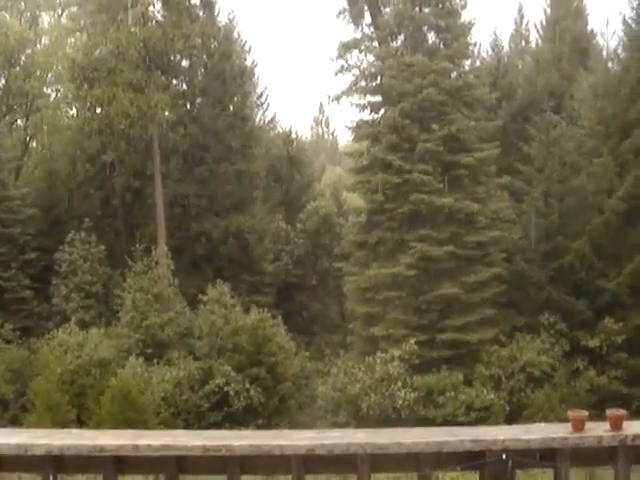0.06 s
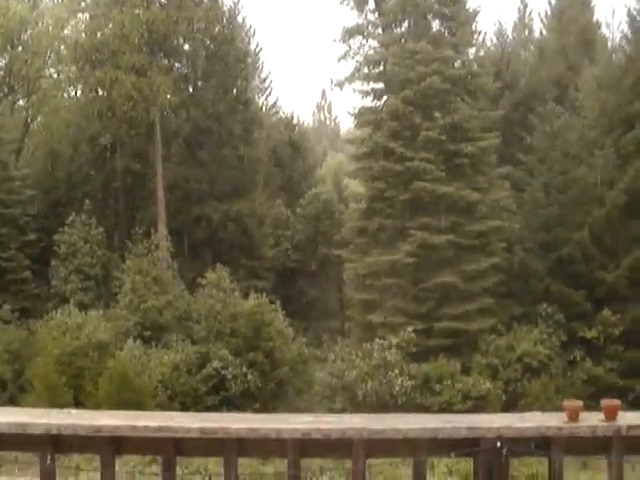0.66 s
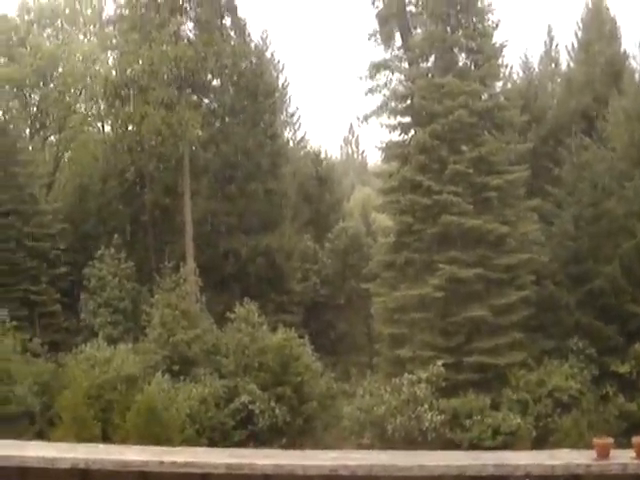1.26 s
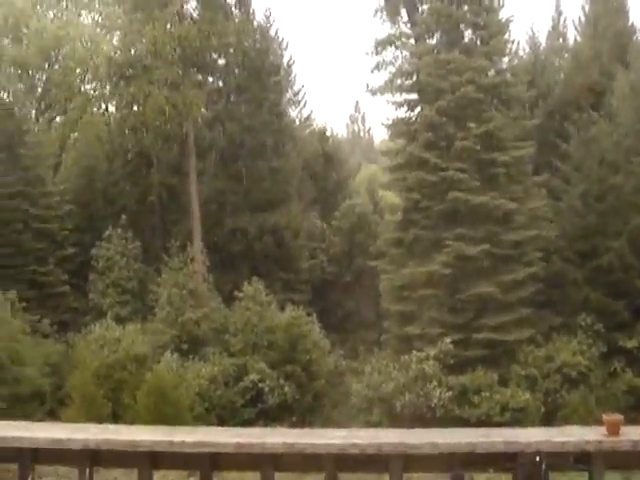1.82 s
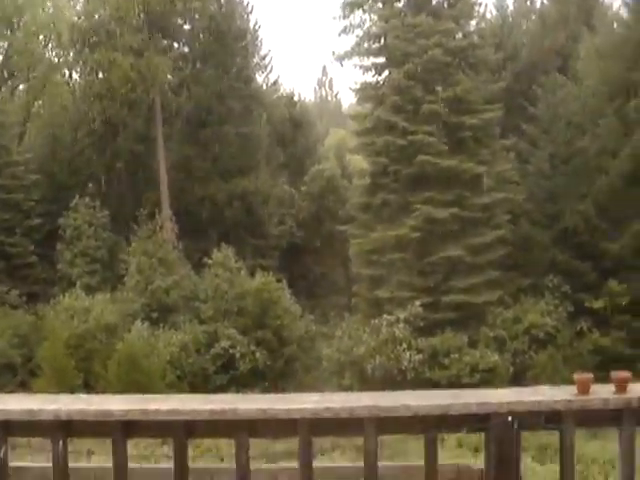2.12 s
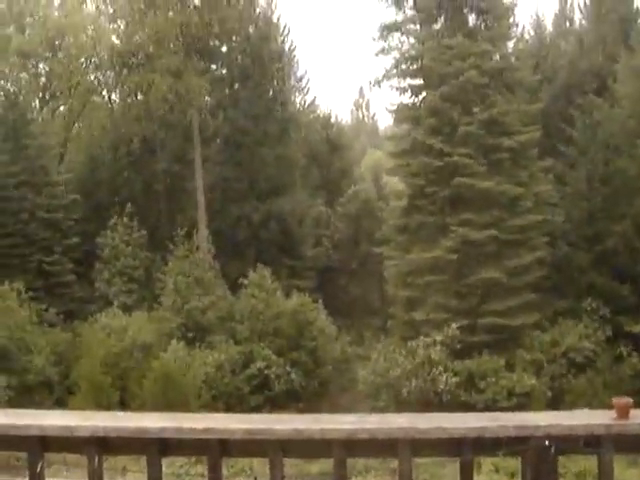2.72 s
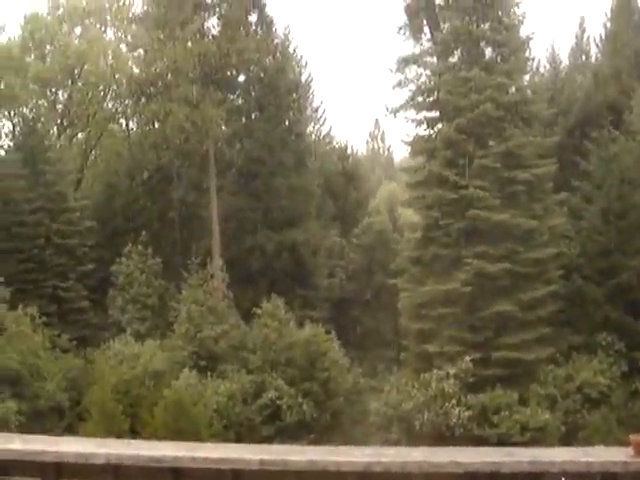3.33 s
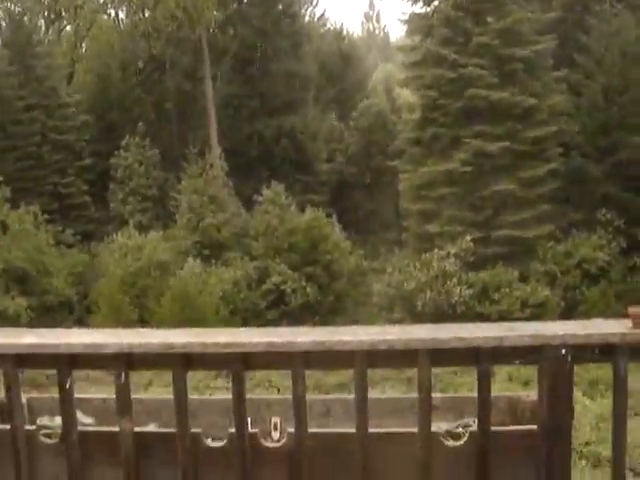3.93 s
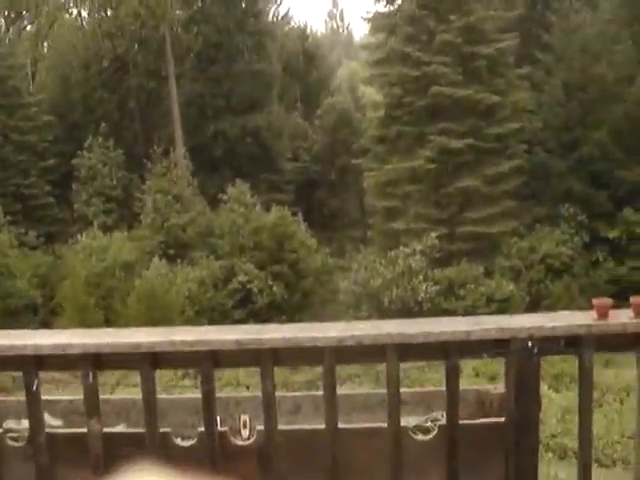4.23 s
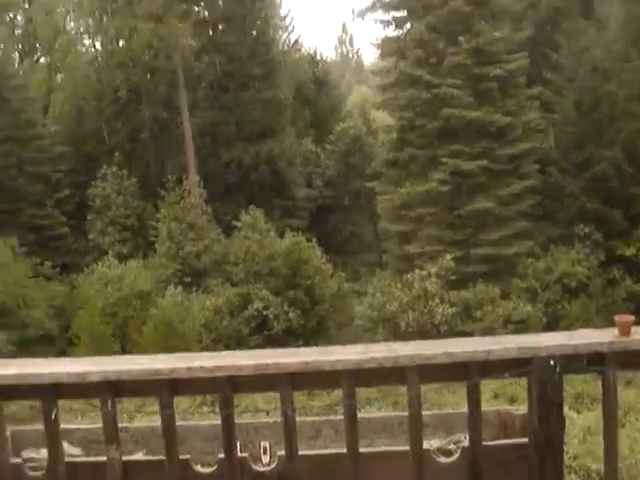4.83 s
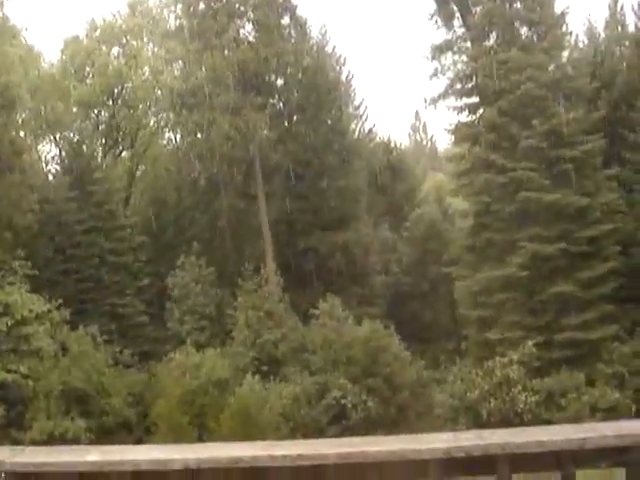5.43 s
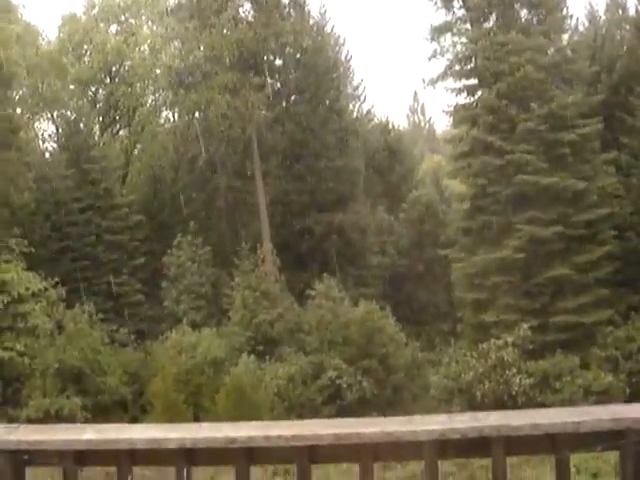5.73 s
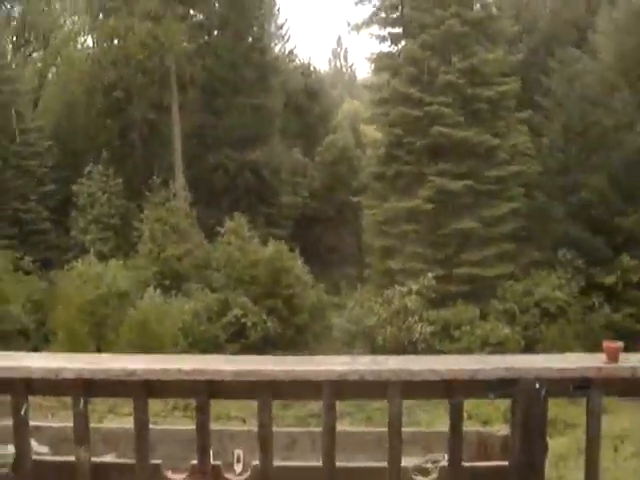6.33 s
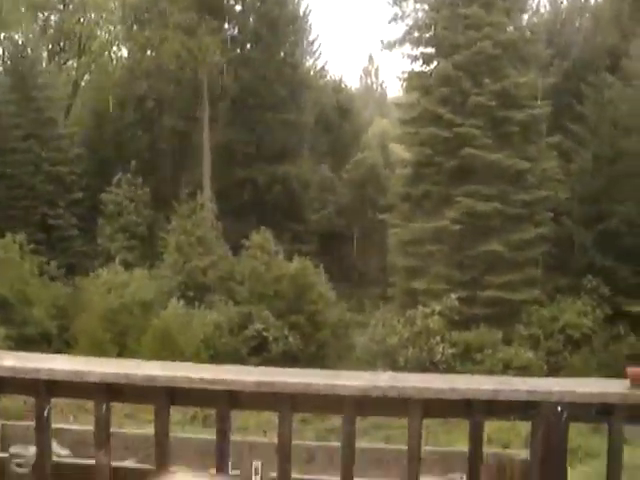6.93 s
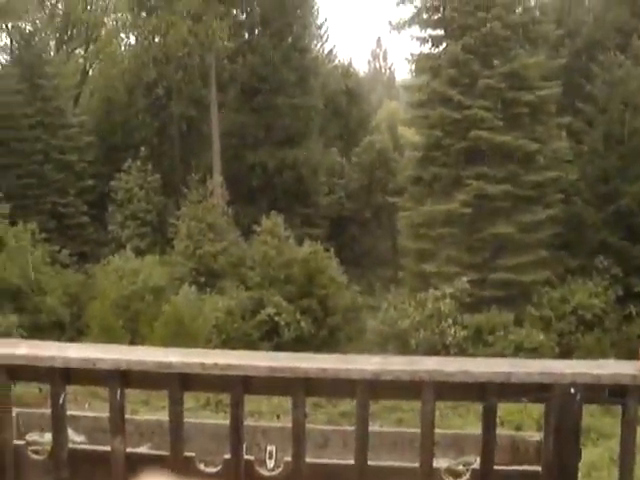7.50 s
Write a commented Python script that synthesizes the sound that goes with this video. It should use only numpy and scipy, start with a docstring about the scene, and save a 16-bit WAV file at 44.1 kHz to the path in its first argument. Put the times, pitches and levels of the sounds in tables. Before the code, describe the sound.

Steady rain falls on trees for the whole seven and a half seconds, heard from a wooden deck through a small hand-held camera. Distant drops blend into a wide, even hiss, nearer ones tick on leaves and the rail, and fine spray prickles on the boards. Single fat drips land close by at about 0.5 seconds, between 1.6 and 1.9, and now and then from 3.5 to 6.2, the brightest at 4.4. Fingers bump the camera lightly around 0.6, 1.6 and 2.7 seconds, and rub it softly near 1.5, 4, 5 and 7 seconds. Stronger knocks come at 5.2 and 5.5 seconds, then one sharp tap with a small low thump at 5.9, followed by duller knocks at 6.6 and 6.9. A very faint, thin, high electronic whine sits beneath the rain, which barely changes in strength to the end.

```python
"""Steady rain from a wooden deck

Countless far drops on trees merge into a wash; nearer ones tick on leaves and on the rail,
and fine spray prickles on the deck. It is all heard through a small hand-held camera:
fingers rub and bump its case and once tap it sharply, and its electronics whine faintly."""
import sys
import numpy as np
from scipy import signal
from scipy.fft import rfft, irfft
from scipy.io import wavfile
from scipy.ndimage import uniform_filter1d

SR = 44100
rng = np.random.default_rng(int(sys.argv[2]) if len(sys.argv) > 2 else 0)


def transcribe(signal):
    """Save signal, clipped to [-1, 1], as a 16-bit WAV file at the path in sys.argv[1]."""
    frames = np.atleast_2d(signal).T
    limited = np.clip(frames, -1, 1)
    pcm = np.round(limited * 32767).astype(np.int16)
    wavfile.write(sys.argv[1], SR, pcm)


N = 337806
TIME = np.arange(N) / SR
FREQS = np.fft.rfftfreq(N, 1 / SR)


def wash(spread_db=2.5, flicker_db=0.77, count=90000):
    """Rain on the whole wood arrives from all sides, partly shared by the two microphone ports."""
    # tone of the wash: f/Hz, relative level per Hz/dB, left minus right/dB
    tone = [(15.0, -2, 2), (30.0, -0.5, -3), (60.0, -5.5, -6), (120.0, -2, -4.5), (216, -2.5, -6),
            (443, -0.5, -5.5), (650.0, 1, -3.5), (980, 1.76, -1), (1790, -1, -3), (2770, -2, -2),
            (3540, -5.5, 1), (4620, -6.5, 1.2), (6020, -10.5, 2.5), (6940, -13, 0), (10330, -19, 0.5)]
    # stereo image at the ports: f/Hz, likeness/0-1, lead of the left port/rad
    image = [(60.0, 0.57, 3.3), (120.0, 0, 2.63), (230, 0.77, 0.94), (428, 0.61, 0.3), (650.0, 0.71, 0.38),
             (1800.0, 0.68, 0.3), (2700.0, 0.52, 1.3), (3480, 0.48, 0.43), (4730, 0.03, 0.4),
             (6080, 0.48, 0.1), (7720, 0, 4.4), (9800.0, 0.23, 2.7)]
    colour_db, balance_db = spectra(tone)
    likeness, lead = spectra(image)
    shared, left, right = (rfft(far_drops(spread_db, flicker_db, count)) for _ in range(3))
    common = np.sqrt(likeness) * shared * np.exp(.5j * np.array([lead, -lead]))
    diffuse = np.sqrt(1 - likeness) * np.array([left, right])
    eq = undb(colour_db + np.array([balance_db, -balance_db]) / 2)
    return unit(irfft((common + diffuse) * eq, N))


def far_drops(spread_db, flicker_db, count):
    """Dense impacts of unequal size; each octave flickers as boughs shed their water."""
    when, size, polarity = rng.random((count, 3)).T
    strength = np.sign(polarity - .5) * undb(-spread_db * np.log(1 - .999 * size))
    hits = np.bincount((when * N).astype(int), strength, N)
    spectrum = rfft(unit(hits))
    octave = np.log2(np.maximum(FREQS, 32) / 32)
    bands = (irfft(spectrum * np.maximum(1 - abs(octave - k), 0), N) for k in range(10))
    return sum(band * undb(flicker_db * wander(rate_hz=22)) for band in bands)


def patter(low_hz=1100, high_hz=7500, spread_db=4.0, width_db=6, cycles=0.71, count=900):
    """Drops tick on the nearer shrubs, each leaf with its own pitch and place."""
    out = np.zeros((2, N))
    for when, pitch, size, place in rng.random((count, 4)):
        hz = low_hz * (high_hz / low_hz) ** pitch
        db = -spread_db * np.log(max(size, np.exp(-4)))
        add(out, when * N / SR, splat(hz, cycles) * undb(db) * pan(width_db * (2 * place - 1)))
    return out


def drips(splash_db=-23, rebound_db=-11, rebound_s=0.0044):
    """Fat drops land close by and burst into droplets, the largest of which lands just after."""
    # single near drops: t/s, level/dB, f/Hz, decay/cycles, left minus right/dB
    near_drops = [(.504, -24.5, 1600, 1.5, -1), (1.6345, -21, 6700, 1, 1), (1.7725, -22.5, 3520, 2.3, -1),
                  (1.8757, -24, 5800, 1, 4), (3.5334, -21, 9000, .7, 8), (4.2142, -28.5, 4840, 7, 0),
                  (4.3806, -24.5, 4200, 2, -2), (4.4316, -11, 7700, .6, -2), (4.7742, -24, 8000, 0.88, 1),
                  (4.79, -20, 6450, 1, 3), (5.742, -25, 6000, 1.4, -1), (6.169, -20.5, 4900, 1.7, 0),
                  (7.2745, -33, 7600, 9, 1)]
    out = np.zeros((2, N))
    for s, db, hz, cycles, pan_db in near_drops:
        gain = undb(db) * pan(pan_db)
        impact = gain * splat(hz, cycles)
        splash = gain * crackle(fade_s=0.014, low_hz=hz / 2, high_hz=2 * hz)
        add(out, s, impact)
        add(out, s + rebound_s, undb(rebound_db) * impact)
        add(out, s, undb(splash_db) * splash)
    return out


def splat(hz, cycles):
    """A drop's impact briefly rings what it lands on."""
    t = TIME[:512]
    return np.sin(2 * np.pi * hz * t) * np.exp(-t * hz / cycles)


def spray(low_hz=4500, spread_db=3, bunch_db=4, count=2500):
    """Tiny droplets prickle on the deck in uneven bunches."""
    when, size, place = rng.random((count, 3)).T
    onsets = (when * N).astype(int)
    strength = undb(-spread_db * np.log(np.maximum(size, np.exp(-4))))
    hits = np.array([np.bincount(onsets, strength * share, N) for share in (place, 1 - place)])
    bunches = undb(bunch_db * np.tanh(wander(rate_hz=13)))
    low_cut = signal.butter(2, low_hz, "high", fs=SR, output="sos")
    return unit(signal.sosfilt(low_cut, hits * bunches))


def knocks(thump_db=-19, press_s=0.0049, leak_s=0.013):
    """Fingers bump the case; the sharpest tap also presses air into the ports, which leaks away."""
    # finger bumps: t/s, strength/dB, contact time/ms
    bumps = [(0.504, -12, 0.16), (0.7, -9, 0.7), (1.584, -9, 0.26), (2.739, -15, 0.3), (4.214, -11, 0.5),
             (5.173, -2.5, 0.25), (5.451, 2, 0.75), (5.923, 2, 0.046), (6.602, -0.5, 0.62),
             (6.695, -12, 0.4), (6.856, 1, 1)]
    out, t = np.zeros((2, N)), TIME[:8192]
    for s, db, contact_ms in bumps:
        add(out, s, undb(db) * case_ring(contact_ms))
    sharpest_s = min(bumps, key=lambda row: row[2])[0]
    thump = -undb(thump_db) * (1 - np.exp(-t / press_s)) * np.exp(-t / leak_s)
    add(out, sharpest_s, thump * pan(db=0))
    return out


def case_ring(contact_ms, crack_db=-19):
    """The case answers a push with its modes and a crack; a longer contact dulls the highs."""
    # modes of the case: f/Hz, level/dB, t60/s, left minus right/dB
    modes = [(105, -22.5, 0.04, 1), (300, -11, 0.05, -1), (347, -20, 0.049, -3.5), (830, -18.5, 0.024, -14),
             (1106, -9, 0.026, -13), (1377, -15, 0.013, -19), (1760, 0, 0.0086, -10.5),
             (2220, -9.5, 0.0081, -15), (2980, -12, 0.0088, 3.5), (3960, -13, 0.0098, 9),
             (4660, -24, 0.0034, -2), (6130, -9.5, 0.0081, -22), (7900, -8, 0.0055, -17)]
    t = TIME[:4096]
    ring = sum((-1) ** k * undb(db) * pan(pan_db) * np.sin(2 * np.pi * hz * t) * undb(-60 * t / t60)
               for k, (hz, db, t60, pan_db) in enumerate(modes))
    crack = undb(crack_db) * crackle(fade_s=0.0054, low_hz=2200, high_hz=4900)
    push = t * np.exp(-t * 1000 / contact_ms)
    knock = signal.fftconvolve(ring + crack, push[None] / push.sum())[:, :len(t)]
    return knock * np.array([[-1], [1]])  # the case shakes the two ports in opposite directions


def rubbing(contact_ms=0.5, grain_db=4):
    """Skin sticks and slips on the case in many small soft pushes."""
    slips = rng.standard_normal(N) * undb(grain_db * wander(rate_hz=32))
    friction = signal.fftconvolve(slips[None], case_ring(contact_ms))[:, :N]
    return unit(friction) * grip()


def grip(attack_s=.07, release_s=0.061, resting_db=-63):
    """Rubbing envelope: each slide swells, holds and dies away over the stir of the resting hand."""
    # finger slides as the grip shifts: start/s, length/s, level/dB
    slides = [(1.53, 0.12, -45), (2.03, .27, -51), (3.72, 0.43, -41), (4.878, 0.27, -40.5),
              (6.2, 0.15, -47), (6.72, 0.41, -45.5)]
    envelope = undb(resting_db)
    for start, length, db in slides:
        swell = np.clip((TIME - start) / attack_s, 0, 1)
        fade = np.exp(-np.maximum(TIME - start - length, 0) / release_s)
        envelope = envelope + undb(db) * swell * fade
    return envelope


def whine(frame_hz=29.97):
    """Thin electronic tones restart their phase with every camera frame, which adds a slight buzz."""
    # steady tones: f/Hz, rms level/dB
    tones = [(7867, -59.8), (8025, -73)]
    in_frame = TIME % (1 / frame_hz)
    return sum(np.sqrt(2) * undb(db) * np.sin(2 * np.pi * hz * in_frame) for hz, db in tones)


def crackle(fade_s, low_hz, high_hz):
    """A fading burst of band noise, unrelated left and right."""
    band = signal.butter(2, [low_hz, min(high_hz, .45 * SR)], "band", fs=SR, output="sos")
    noise = unit(signal.sosfilt(band, rng.standard_normal((2, 4096))))
    return noise * np.exp(-TIME[:4096] / fade_s)


def wander(rate_hz):
    """Random sample-and-hold, smoothed twice; rms 1."""
    hold = int(SR / rate_hz)
    steps = np.repeat(rng.standard_normal(N // hold + 1), hold)
    return unit(uniform_filter1d(uniform_filter1d(steps, hold), hold)[:N])


def spectra(rows):
    """One curve over FREQS for each column after f/Hz, joined on a log-frequency axis."""
    hz, *columns = np.transpose(rows)
    return [np.interp(np.log(FREQS + 1), np.log(hz), column) for column in columns]


def undb(db):
    """Decibels to gain."""
    return 10 ** (np.asarray(db) / 20)


def unit(x):
    """Scale to rms 1."""
    return x / np.sqrt(np.mean(x ** 2))


def pan(db):
    """Left and right gains for a level difference."""
    return undb(np.array([[db], [-db]]) / 2)


def add(out, s, sound):
    """Mix a short stereo sound in at time s."""
    i = int(s * SR)
    out[:, i:i + sound.shape[1]] += sound[:, :N - i]


def scene(wash_db=3, patter_db=-8, spray_db=-20.0):
    """Wash, patter and spray swell together; drips and the camera's own noises sit on top."""
    # strength of the shower: t/s, gain/dB
    shower = [(0.0, -40), (1.6, -39.5), (2.6, -40.5), (3.65, -41), (4.7, -39.5), (5.3, -39.5), (6.7, -40.5),
              (7.66, -40.8)]
    swell = undb(np.interp(TIME, *np.transpose(shower)))
    rain = undb(wash_db) * wash() + undb(patter_db) * patter() + undb(spray_db) * spray()
    return swell * rain + drips() + knocks() + rubbing() + whine()


def record(dry, low_hz=3, ceiling=.85, top_hz=10030):
    """The camera blocks the deepest bass, hard-limits just under full scale and cuts the top."""
    low_cut = signal.butter(2, low_hz, "high", fs=SR, output="sos")
    high_cut = signal.ellip(12, .2, 80, top_hz, fs=SR, output="sos")
    limited = np.clip(signal.sosfilt(low_cut, dry), -ceiling, ceiling)
    return signal.sosfilt(high_cut, limited)


dry = scene()
out = record(dry)
transcribe(out)
```